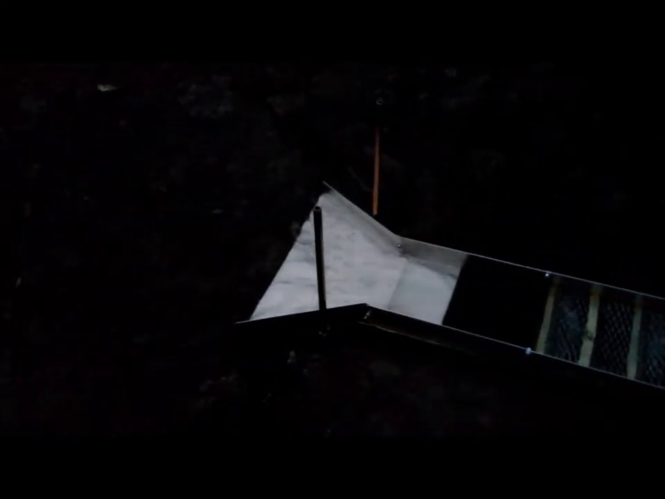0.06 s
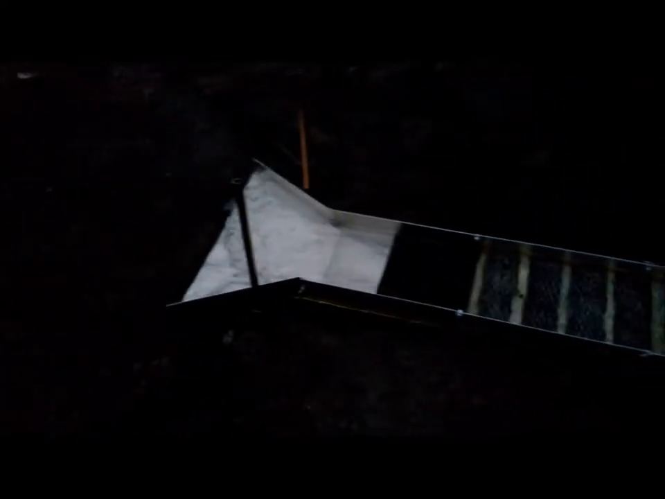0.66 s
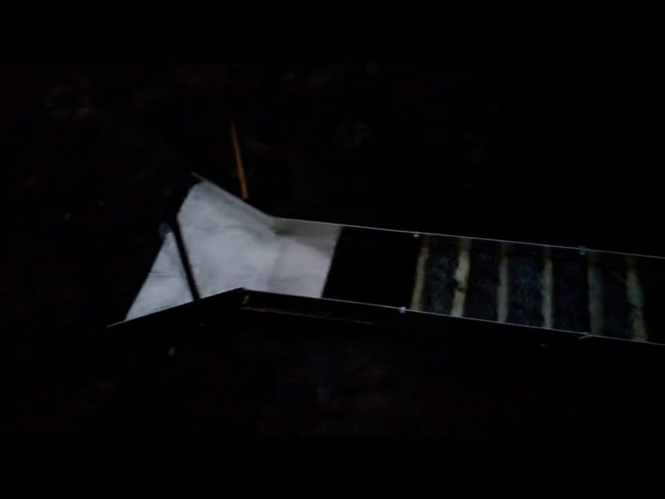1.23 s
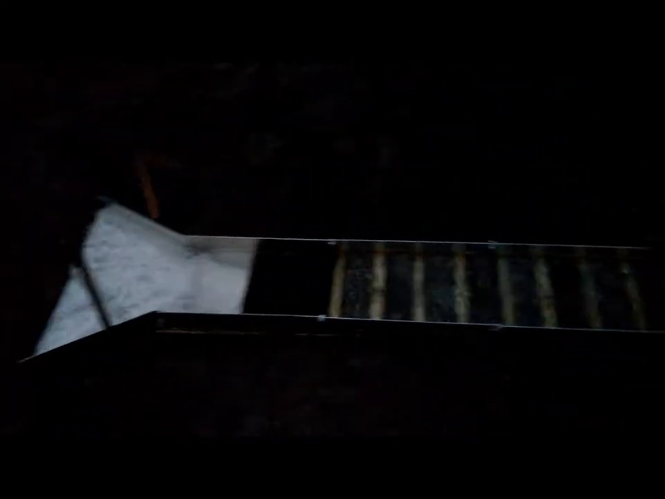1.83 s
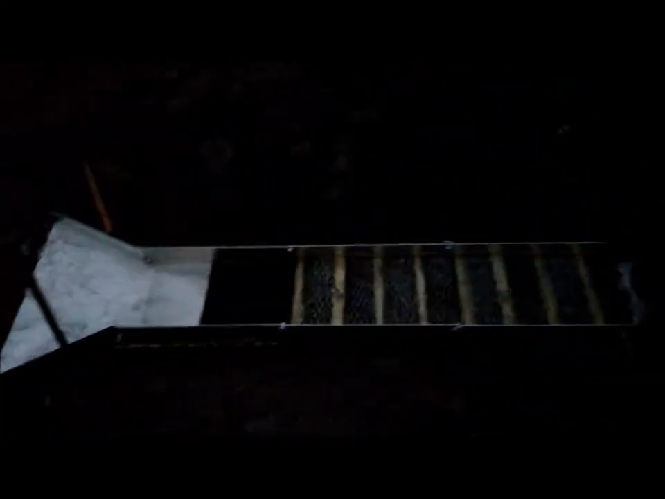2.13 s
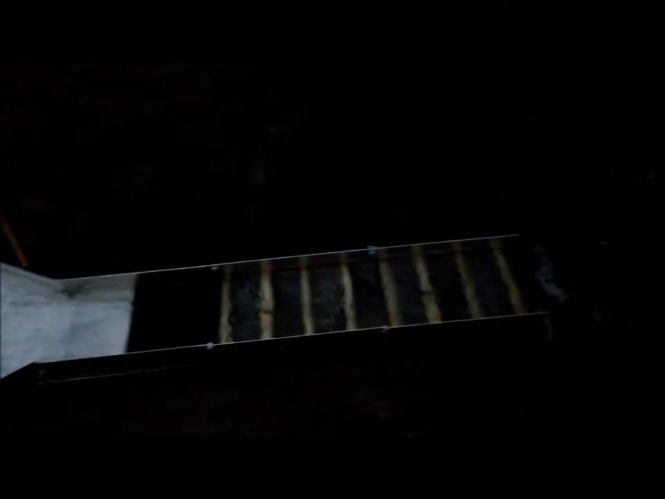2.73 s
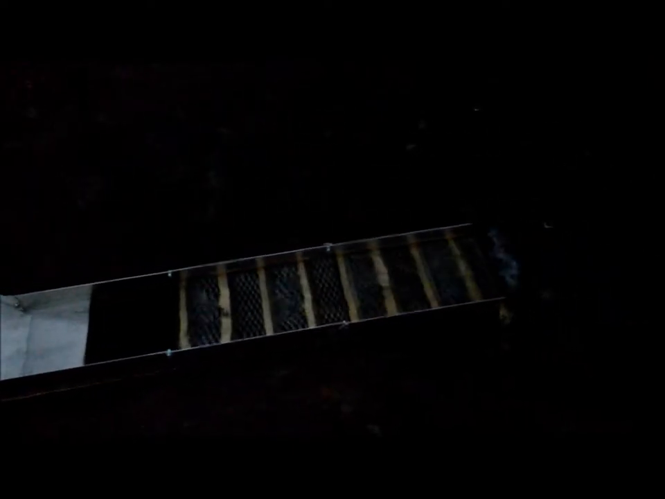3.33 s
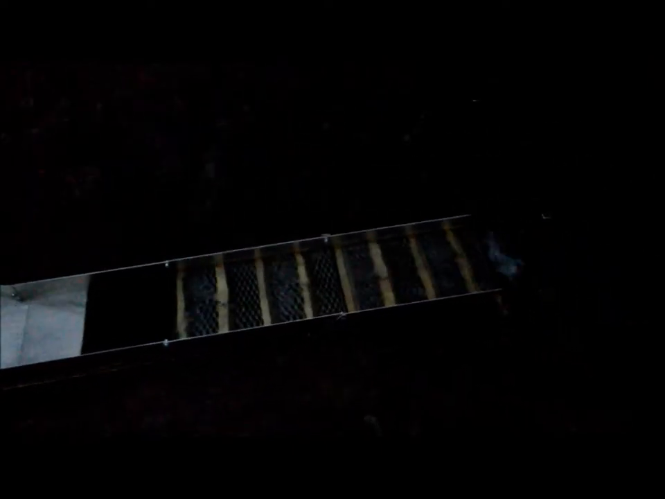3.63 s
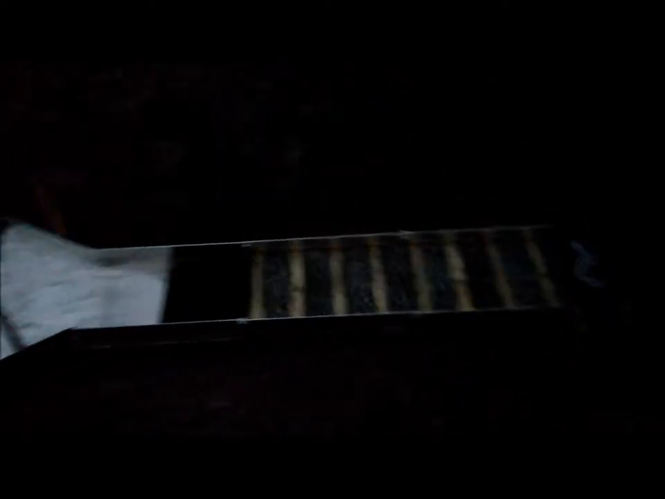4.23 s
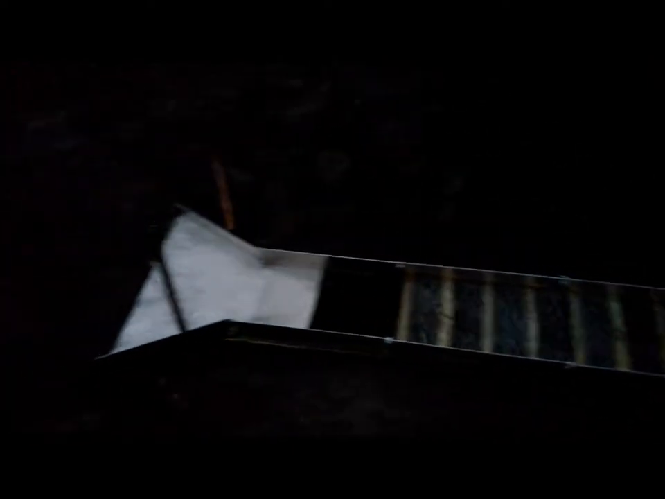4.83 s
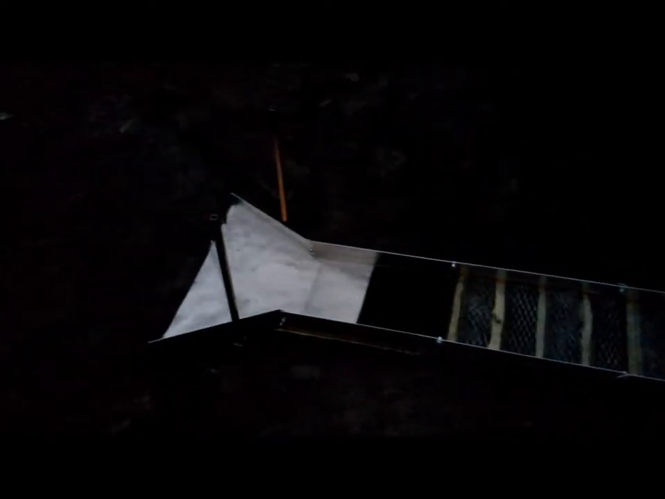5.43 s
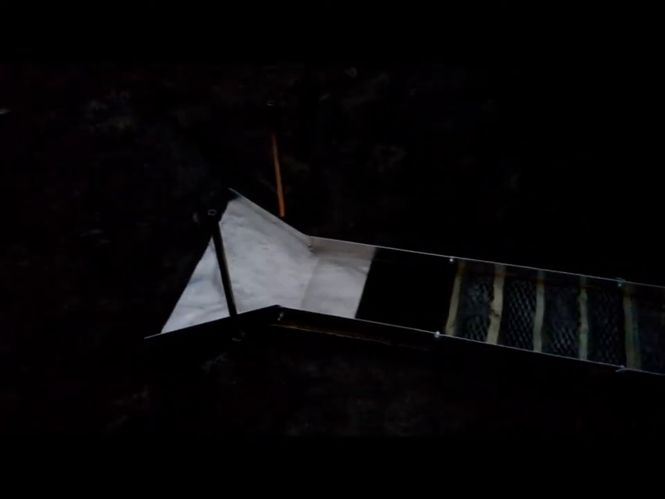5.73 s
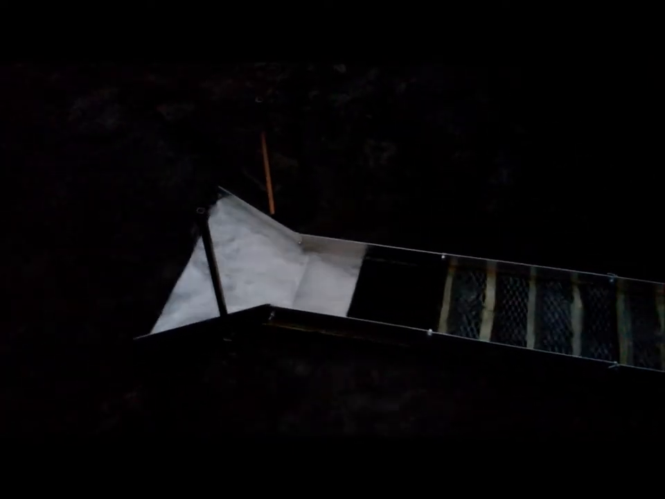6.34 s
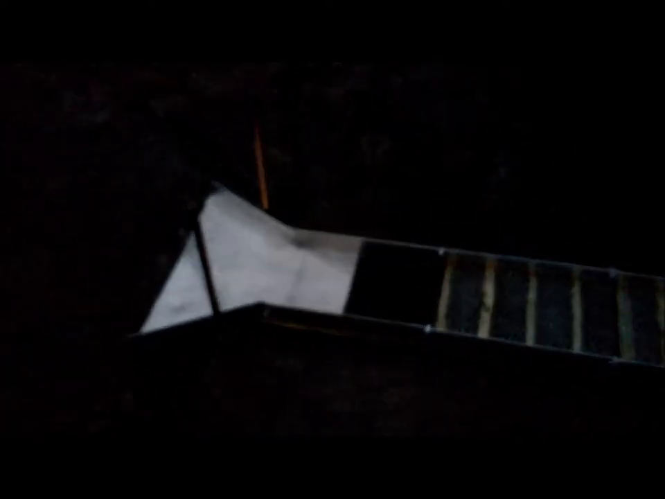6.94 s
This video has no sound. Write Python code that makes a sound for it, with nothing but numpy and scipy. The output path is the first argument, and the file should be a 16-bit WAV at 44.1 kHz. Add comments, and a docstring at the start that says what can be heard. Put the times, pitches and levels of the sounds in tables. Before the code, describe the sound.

Creek water runs through a metal sluice box outdoors and spills off the end in a continuous, bright, fizzing hiss. Small splashes and sharp droplet ticks dot the flow, while bubbles gurgle softly behind the riffles over a faint low rumble. Heard from close by, the spray grows louder and brighter in the middle as the microphone turns toward the outlet, then eases back.

```python
"""Fizzing spray, splashes and ticking droplets: creek water spills off the end of a metal sluice box.
Behind the riffles air pockets gurgle and break up, each bubble ringing with a small upward chirp.
Foam seethes and a thin jet gushes over the low rumble of the creek.
The listener, close by, turns toward the outlet for a while, where the spray is louder and brighter."""
import sys
import numpy as np
from scipy import signal
from scipy.fft import rfft, irfft, dct, next_fast_len
from scipy.io import wavfile

SR = 44100
rng = np.random.default_rng(int(sys.argv[2]) if len(sys.argv) > 2 else 0)


def persist_wave(psi):
    """Save psi, clipped to +-1, as 16-bit WAV."""
    counts = np.round(np.clip(psi, -1, 1) * 32767).astype(np.int16)
    wavfile.write(sys.argv[1], SR, np.atleast_2d(counts).T)


N = 307377
TIME = np.arange(N) / SR

# steady spray before its treble tilt, loudest facing the outlet: t/s, level/dB
SPRAY_FADER = [(0, -28), (1.0, -23), (1.9, -23.5), (2.6, -20.5), (3.9, -20.5), (4.5, -24.5), (4.85, -31),
               (5.2, -27), (6.0, -27.5), (6.55, -26.5), (6.7, -34.5), (6.97, -24)]
# big slaps of water over the lip: crest t/s, level/dB, swell/s
SPLASH_CUES = [(0.237, -20, 0.0046), (0.548, -27, 0.024), (0.843, -21, 0.018), (1.13, -20.5, 0.012),
               (1.628, -14.5, 0.0095), (1.702, -20, 0.013), (2.085, -22.5, 0.022), (2.156, -24.5, 0.017),
               (2.377, -20, 0.011), (2.658, -20, 0.0086), (2.938, -15, 0.011), (3.069, -17, 0.0067),
               (3.318, -18.5, 0.018), (3.499, -14.5, 0.01), (3.54, -16.5, 0.017), (3.696, -19.5, 0.02),
               (3.806, -15, 0.0074), (3.887, -18, 0.0071), (4.256, -16, 0.0034), (4.62, -19.5, 0.0048),
               (5.125, -25.5, 0.039), (5.391, -22.5, 0.0046), (5.734, -25.5, 0.026), (5.818, -19, 0.019),
               (6.594, -22, 0.011), (6.834, -22.5, 0.016)]
# the sharpest droplets: t/s, level/dB before EQ, f/Hz
DROPLET_CUES = [(0.3495, -3.5, 8500), (0.5105, 1, 12200), (0.6523, -4.5, 7900), (0.7605, -3.5, 8200),
                (1.0368, 0.5, 8300), (1.0555, -1.5, 8950), (1.1321, -1.5, 7700), (1.2058, -1, 8850),
                (1.4373, -6, 11400), (1.6277, -1, 11900), (1.6675, -1, 10900), (1.6985, -0.5, 8450),
                (2.0198, -3, 8400), (2.079, 0, 13200), (2.401, -1.5, 11600), (2.44, -3, 11800),
                (2.578, -1, 12200), (2.7812, -5, 6900), (2.813, 2, 12250), (2.9825, -1, 11200),
                (3.155, 2.5, 11200), (3.321, 3, 12700), (3.37, 0.5, 10800), (3.5035, -7, 12800),
                (3.5684, -6.5, 6860), (3.637, -1, 10260), (3.7125, 1, 11200), (3.7695, 0.5, 11530),
                (3.8038, 0.5, 11900), (3.8835, 2, 10200), (3.9025, 2.5, 12440), (3.962, 0.5, 12300),
                (4.0574, -1, 11900), (4.1143, 0.5, 11900), (4.259, -5, 8500), (5.031, -8, 12300),
                (5.1062, -7, 9000), (5.158, -6, 7680), (5.2113, -4, 12000), (5.5313, -5.5, 10000),
                (5.7065, -2, 11900), (5.8272, -1.5, 8900), (6.088, -7, 7600), (6.2037, -8, 8260),
                (6.2456, -9.5, 7700), (6.301, -6, 8800), (6.424, -8, 10100), (6.532, -7, 8500),
                (6.784, -7, 10070), (6.883, -5, 12500)]
# the clearest air pockets breaking up: crest t/s, level/dB over 20 ms, f/Hz
BUBBLE_CUES = [(0.073, -33.5, 491), (0.166, -39, 855), (0.265, -42, 2190), (0.459, -34, 860),
               (0.554, -24.5, 7800), (0.669, -32.5, 1020), (0.691, -33.5, 746), (0.702, -25.5, 7200),
               (0.788, -33.5, 933), (0.839, -36.5, 803), (0.865, -34.5, 2480), (0.902, -31, 4520),
               (0.979, -33, 3520), (1.001, -35, 857), (1.033, -36.5, 1700), (1.041, -33, 3870),
               (1.123, -35.5, 742), (1.133, -34, 7310), (1.138, -25, 6120), (1.202, -35.5, 824),
               (1.236, -29.5, 2440), (1.3, -33, 4700), (1.411, -30, 5770), (1.443, -25.5, 6920),
               (1.444, -30.5, 2550), (1.469, -37, 790), (1.525, -38, 570), (1.608, -37.5, 820),
               (1.69, -33, 3260), (1.695, -34, 796), (1.831, -32, 880), (1.882, -34, 754),
               (1.997, -37, 905), (2.026, -32.5, 3880), (2.03, -31.5, 527), (2.081, -33.5, 670),
               (2.153, -27, 5320), (2.231, -34.5, 728), (2.328, -29, 4300), (2.368, -31, 1003),
               (2.603, -32, 946), (2.816, -32, 1066), (3.031, -33.5, 2690), (3.102, -32.5, 768),
               (3.139, -30, 4350), (3.164, -37, 765), (3.195, -26, 5800), (3.254, -37, 1080),
               (3.303, -32, 3210), (3.424, -32.5, 970), (3.518, -37.5, 810), (3.675, -33, 3800),
               (3.737, -37, 775), (3.744, -37.5, 1480), (3.748, -30, 5200), (3.877, -34.5, 2720),
               (3.895, -38, 800), (3.966, -37, 1260), (4.115, -28.5, 5140), (4.132, -35, 796),
               (4.187, -30, 3900), (4.194, -33, 680), (4.228, -31, 1313), (4.256, -29, 3520),
               (4.355, -35, 1675), (4.409, -33.5, 1095), (4.45, -36, 805), (4.533, -35, 1187),
               (4.625, -31.5, 4650), (4.63, -38, 670), (4.673, -36, 905), (4.786, -36, 730),
               (4.996, -35.5, 3170), (5.005, -37.5, 820), (5.041, -33.5, 890), (5.053, -37.5, 573),
               (5.101, -36, 770), (5.255, -37, 2900), (5.284, -33.5, 745), (5.312, -35, 800),
               (5.315, -36, 2230), (5.39, -33.5, 788), (5.458, -34, 1095), (5.464, -36, 770),
               (5.473, -36, 2240), (5.513, -40, 1820), (5.538, -31.5, 910), (5.912, -35, 3420),
               (6.046, -32.5, 590), (6.132, -33, 750), (6.21, -34, 3490), (6.237, -34, 790),
               (6.279, -35, 1250), (6.283, -31.5, 4040), (6.374, -38, 2260), (6.513, -32, 950),
               (6.76, -41, 2720), (6.85, -35.5, 1880), (6.855, -33, 791), (6.913, -37, 830)]
# fainter pockets, large to small: rate/(1/s), level/dB over 20 ms, lowest f/Hz, highest f/Hz
FAINT_POCKETS = [(3, -46.5, 540, 1400), (4, -46, 1400, 2600), (3, -38.5, 2400, 5600)]
# bubble showers where a splash folds under: crest t/s, level/dB, swell/s, middle f/Hz
SHOWER_CUES = [(0.684, -39, .012, 930), (0.82, -37, 0.02, 4740), (2.155, -25.5, 0.0063, 4900),
               (2.379, -31.5, 0.013, 4397), (2.581, -34, 0.03, 4650), (2.94, -31, 0.0079, 4850),
               (3.075, -23, 0.0047, 4850), (3.11, -37, 0.031, 732), (3.125, -29.5, .02, 4824),
               (3.719, -33, .017, 5200), (3.725, -34.5, 0.016, 3170), (3.966, -33.5, .007, 4060),
               (4.65, -36, 0.03, 644.5), (5.06, -38, .025, 897), (5.41, -37.5, .035, 830),
               (5.82, -33, 0.017, 5440), (6.615, -37, .014, 5720), (6.853, -28, .002, 2910)]
# seething foam, mostly 3 to 6 kHz: t/s, level/dB
SEETHE_FADER = [(0, -35), (0.2, -50), (0.55, -41), (0.9, -38), (1.6, -44), (1.85, -39.5), (2.5, -39.5),
                (4.2, -40), (4.5, -41.5), (4.8, -36.5), (5.1, -39.5), (5.5, -42), (6.25, -43.5), (6.8, -48),
                (6.97, -35)]
# thin jet between the riffles: t/s, level/dB
JET_FADER = [(0, -46), (1.8, -49), (4.15, -55), (4.45, -46), (6.3, -45.5), (6.39, -40.5), (6.47, -39.5),
             (6.56, -47), (6.6, -36.5), (6.66, -45), (6.74, -37), (6.97, -41)]
# heaves of the rumble: crest t/s, rise/dB before EQ
HEAVE_CUES = [(2.6, 7), (3.4, 5.5), (4.03, 7), (6.02, 6), (6.4, 6.5)]
# tone of each layer: f/Hz, level/dB
SPRAY_EQ = [(300, -21.5), (1500, -15.5), (3000, -15), (4500, -7), (5400, -8), (6300, -6), (7200, -0.5),
            (8300, 1), (10000, 1.4), (11800, 2), (13000, 1), (14200, -1.5), (16000, -4.5)]
GURGLE_EQ = [(200, -48), (380, -11.5), (480, -5), (620, -3.5), (770, 2), (1020, 0.5), (1350, -10.5),
             (1900, -4.5), (4000, -44)]
SEETHE_EQ = [(1800, -23), (2700, -8), (3300, -3.5), (4300, -4.5), (6000, -6), (9000, -21.5)]
WASH_EQ = [(100, -15), (400, -17), (700, 8), (1300, 3), (1900, -2.5), (2700, -12), (4000, -7), (6000, -36),
           (16000, -8)]
RUMBLE_EQ = [(10, -20), (28, -11.5), (50, -6.5), (75, -2.5), (105, -0.5), (145, -7.5), (195, -12),
             (250, -18), (380, -23.5), (700, -40), (2000, -70)]
HEAVE_EQ = [(105, 2.5), (165, -20)]


def spill():
    """Envelope of the water over the lip: a fluttering flow, big splashes and small random slaps."""
    power = gain_of(spray_db(TIME) + 0.98 * wander(per_s=66)) ** 2
    slaps = [(s, spray_db(s) + 4 + db, swell_s)
             for s, db, swell_s in chance(per_s=6, spread_db=3.5, low=0.0014, high=0.0056)]
    for s, db, swell_s in SPLASH_CUES + slaps:
        u = np.arange(0, 7, 1 / (swell_s * SR))
        add(power, s - swell_s, (gain_of(db) * swell(u)) ** 2)
    return np.sqrt(power)


def spray(flow):
    """Fizz and countless tiny bursting bubbles; the top octave beams out of the outlet."""
    fizz = patchy_noise(SPRAY_EQ, depth_db=3, patch_hz=1830, patch_s=0.0065, size=256)
    grains = swarm(5050, 16200, per_s=3000, cycles=1.4, spread_db=5, rise=0.093, sizes=60)
    grains = unit_rms(spatter(eq(grains, SPRAY_EQ), spatter_db=-12, fade_s=0.0083))
    mist = flow * (gain_of(-4) * fizz + gain_of(-2) * grains)
    top = eq(mist, [(7000, -41), (9000, -22), (11500, -10.5)])
    averted_db = -29.5  # spray level at which the tilt is flat
    tilt_db = 1.12 * (spray_db(TIME) - averted_db)
    return (mist - top) * gain_of(-tilt_db / 2) + top * gain_of(tilt_db / 2)


def droplets():
    """Each near droplet lands with a tick a few cycles long; lesser drips fall at random."""
    out = np.zeros(N)
    drips = [(s, spray_db(s) + 16.5 + db, hz)
             for s, db, hz in chance(per_s=2.6, spread_db=0.5, low=8200, high=13100)]
    for s, db, hz in DROPLET_CUES + drips:
        swell_s = 2.1 / hz
        add(out, s - swell_s, gain_of(db) * ring(hz, swell_s, rise=0.01))
    ticks = eq(out, [(2000, -13), (5000, 4), (7000, -3)])
    return spatter(ticks, spatter_db=-4, fade_s=0.0029)


def air_pockets():
    """A pocket breaks up with a snap: one clear bubble rings inside a cloud, and two trail after."""
    out = np.zeros(N)
    faint = [(s, level_db + db, hz) for per_s, level_db, low, high in FAINT_POCKETS
             for s, db, hz in chance(per_s, spread_db=2, low=low, high=high)]
    for s, db, hz in BUBBLE_CUES + faint:
        strength = gain_of(db) * np.sqrt(0.02 * SR)
        clear = blip(hz)
        start = s - np.argmax(abs(clear)) / SR
        cloud_s = 0.0055 * (hz / 1000) ** -0.25
        cloud_share = value_at([(500, 0.2), (800, 0.23), (1500, 0.097), (4500, 0.44)], hz)
        add(out, start, strength * np.sqrt(1 - cloud_share) * clear)
        add(out, s - cloud_s, strength * np.sqrt(cloud_share) * cloud(hz, cloud_s))
        for delay, pitch in wake(hz):
            add(out, start + delay, strength * gain_of(-11) * rng.random() * blip(pitch))
        snap = unit_energy(ring(1.31 * hz, 1.4 / hz, rise=0))
        snap_db = value_at([(1000, -15), (2000, -13.5), (4000, -11)], hz)
        add(out, start, strength * gain_of(snap_db) * snap)
    return sluice_reverb(out, wet_db=-11, t60=0.08)


def blip(hz):
    """One clear bubble: small ones die sooner, and each chirps upward by its own amount."""
    swell_s = 0.0056 * (hz / 1000) ** -0.5 * rng.uniform(0.75, 1.3)
    return unit_energy(ring(hz, swell_s, rise=rng.uniform(0.03, 0.13)))


def cloud(hz, swell_s):
    """A blur of bubbles close to one size, born in spurts."""
    u = np.arange(0, 7, 1 / (swell_s * SR))
    spurts = abs(band_noise(len(u), width_hz=670)) ** 0.75
    blur = (band_noise(len(u), width_hz=0.17 * hz) * np.exp(2j * np.pi * hz * swell_s * u)).real
    return unit_energy(swell(u) * spurts * blur)


def wake(hz, count=2, wait_s=0.013, octaves=0.29):
    """Bubbles shed behind a pocket: delay/s, f/Hz."""
    wait, detune = rng.random((count, 2)).T
    return zip(np.cumsum(wait_s * (wait + 0.5)), hz * 2 ** (octaves * (2 * detune - 1)))


def showers(births_per_cycle=0.14, octaves=0.16, swell_cycles=4):
    """A splash drags air under: a crowd of small bubbles rings briefly around one pitch."""
    out = np.zeros(N)
    for s, db, swell_s, middle_hz in SHOWER_CUES:
        crowd = np.zeros(SR // 2)
        count = int(4 * swell_s * births_per_cycle * middle_hz) + 2
        for early, late, strength, detune in rng.random((count, 4)):
            hz = middle_hz * 2 ** (octaves * np.sqrt(12) * (detune - 0.5))
            delay = -swell_s * np.log(early * late) / np.sqrt(2)  # births bunch up, then thin out
            add(crowd, delay, strength ** 2 * ring(hz, swell_cycles / hz, rise=0.091))
        add(out, s - swell_s, gain_of(db) * np.sqrt(2 * swell_s * SR) * unit_energy(crowd))
    return sluice_reverb(out, wet_db=-9, t60=0.049)


def gurgle():
    """Large bubbles churn behind the riffles: gliding blips over a soft blur of distant ones."""
    distant = patchy_noise(GURGLE_EQ, depth_db=3.5, patch_hz=213, patch_s=0.046, size=1024)
    near = swarm(490, 1400, per_s=100, cycles=4.6, spread_db=1.9, rise=0.065, sizes=48)
    near = unit_rms(eq(sluice_reverb(near, wet_db=-11.5, t60=0.044), GURGLE_EQ))
    return gain_of(-47) * distant + gain_of(-42.5) * near


def trickle():
    """Middle-sized bubbles tinkle and tick over the creek's wash; foam seethes, coming and going."""
    tinkle = swarm(1150, 3000, per_s=130, cycles=6.5, spread_db=3, rise=0.06, sizes=36)
    ticks = swarm(1500, 5000, per_s=45, cycles=1.2, spread_db=2.5, rise=0, sizes=20)
    foam = swarm(2700, 6500, per_s=650, cycles=4.6, spread_db=3.3, rise=0.05, sizes=36)
    hiss = patchy_noise(SEETHE_EQ, depth_db=6, patch_hz=900, patch_s=0.027, size=512)
    wash = patchy_noise(WASH_EQ, depth_db=4.5, patch_hz=500, patch_s=0.04, size=512)
    seethe = gain_of(fader(SEETHE_FADER)) * (gain_of(-3.5) * foam + gain_of(-5.5) * hiss)
    in_box = gain_of(-45.5) * tinkle + gain_of(-50.5) * ticks + seethe
    return sluice_reverb(in_box, wet_db=-8, t60=0.049) + gain_of(-42.5) * wash


def jet(base_hz=2544, base_db=-45, sag_hz_per_db=16):
    """A narrow, hollow gush: a stronger jet digs a larger air cavity and sounds lower."""
    db = fader(JET_FADER)
    pitch = (base_hz - sag_hz_per_db * (db - base_db)) * (1 + 0.03 * wander(per_s=30.3))
    gush = (band_noise(N, width_hz=520) * np.exp(2j * np.pi * np.cumsum(pitch) / SR)).real
    flutter = gain_of(3.7 * wander(per_s=86))
    return gain_of(db) * unit_rms(gush * flutter)


def rumble(heave_s=0.073):
    """The deep churn of the creek, its low end heaving now and then, and a faint wavering hum."""
    deep = patchy_noise(RUMBLE_EQ, depth_db=3, patch_hz=60.4, patch_s=0.078, size=4096)
    heave_db = sum(db * np.exp(-((TIME - s) / heave_s) ** 2) for s, db in HEAVE_CUES)
    heave = (gain_of(heave_db) - 1) * eq(deep, HEAVE_EQ)
    hum_hz = 161.4 + 2 * wander(per_s=4.7)
    hum = np.sin(2 * np.pi * np.cumsum(hum_hz) / SR) * gain_of(3.2 * wander(per_s=2))
    return gain_of(-46.5) * (deep + heave) + gain_of(-57.5) * unit_rms(hum)


def ring(hz, swell_s, rise):
    """One bubble swells, rings out, and climbs in pitch as it nears the surface."""
    u = np.arange(int(9 * swell_s * SR) + 2) / (swell_s * SR)
    pitch = hz * (1 + rise * np.tanh((u - 1) / 2))
    return swell(u) * np.sin(2 * np.pi * (np.cumsum(pitch) / SR + rng.random()))


def swarm(low_hz, high_hz, per_s, cycles, spread_db, rise, sizes):
    """Bubbles of many sizes at random moments; most are faint, a few stand out."""
    out = np.zeros(N)
    pitches = np.geomspace(low_hz, high_hz, sizes)
    for hz, (length, glide) in zip(pitches, rng.uniform(0.5, 1.5, (sizes, 2))):
        when, rarity, lot = rng.random((3, 2000))
        born = lot < per_s * TIME[-1] / sizes / len(lot)
        accent_db = spread_db * np.minimum(-np.log(rarity[born]), 3.8)
        triggers = np.bincount((when[born] * N).astype(int), gain_of(accent_db), N)
        bubble = ring(hz, length * cycles / hz, glide * rise)
        out += unit_rms(signal.oaconvolve(triggers, bubble)[:N])
    return unit_rms(out)


def spatter(x, spatter_db, fade_s):
    """Each tick throws off finer drops: a brief fizz that dies away behind it."""
    decay = np.exp(-1 / (fade_s * SR))
    power = signal.lfilter([1 - decay], [1, -decay], x ** 2)
    fizz = unit_rms(eq(rng.standard_normal(N), SPRAY_EQ))
    return x + gain_of(spatter_db) * np.sqrt(power) * fizz


def sluice_reverb(x, wet_db, t60):
    """The metal walls and the water surface scatter each sound back within milliseconds."""
    t = np.arange(4096) / SR
    taps = rng.standard_normal(len(t)) * (rng.random(len(t)) < 0.1)
    tail = taps * (t > 0.0006) * gain_of(-60 * t / t60)
    return x + gain_of(wet_db) * signal.oaconvolve(x, unit_energy(tail))[:N]


def patchy_noise(tone, depth_db, patch_hz, patch_s, size):
    """A noise bed whose level drifts in patches over time and frequency."""
    frames = dict(fs=SR, nperseg=size, noverlap=size * 3 // 4)
    hz, t, spectrum = signal.stft(rng.standard_normal(N), **frames)
    ripples = dct(dct(rng.standard_normal(spectrum.shape), axis=0, norm="ortho"), axis=1, norm="ortho")
    across = np.arange(len(hz))[:, None] * patch_hz / hz[-1]
    along = np.arange(len(t)) * patch_s / t[-1]
    ripples *= np.exp(-across ** 2 - along ** 2)  # only broad ripples survive
    patches = unit_rms(dct(dct(ripples, type=3, axis=0, norm="ortho"), type=3, axis=1, norm="ortho"))
    noise = signal.istft(spectrum * gain_of(depth_db * patches), **frames)[1][:N]
    return unit_rms(eq(noise, tone))


def band_noise(size, width_hz):
    """Complex noise around 0 Hz: the beating of many close pitches."""
    z = rng.standard_normal(size + 2048) + 1j * rng.standard_normal(size + 2048)
    z = signal.sosfilt(signal.butter(2, width_hz / 2, fs=SR, output="sos"), z)[2048:]
    return z / np.sqrt(np.mean(abs(z) ** 2))


def wander(per_s):
    """Smooth random modulation of rms 1 that changes about per_s times a second."""
    hz = np.fft.rfftfreq(2 ** 19, 1 / SR)
    return unit_rms(irfft(rfft(rng.standard_normal(2 ** 19)) / (1 + (hz / per_s) ** 4))[:N])


def chance(per_s, spread_db, low, high):
    """Scattered cues: t/s, level offset/dB, a value between low and high."""
    when, level, value = rng.random((int(per_s * TIME[-1]), 3)).T
    s = (np.arange(len(when)) + when) / per_s
    return np.transpose([s, spread_db * np.sqrt(12) * (level - 0.5), low * (high / low) ** value])


def swell(u):
    """Envelope that crests at u = 1 and dies away."""
    return u * np.exp(1 - u)


def fader(rows, s=TIME):
    """Straight ramps through rows of t/s, level/dB."""
    return np.interp(s, *np.transpose(rows))


def spray_db(s):
    """The spray's fader at time s."""
    return fader(SPRAY_FADER, s)


def eq(x, points):
    """Filters by a curve of f/Hz, level/dB."""
    size = next_fast_len(N + 4096)
    response = gain_of(value_at(points, np.fft.rfftfreq(size, 1 / SR)))
    return irfft(rfft(x, size) * response, size)[:N]


def value_at(points, hz):
    """Reads a curve on a log-frequency axis."""
    f, value = np.transpose(points)
    return np.interp(np.log(hz + 1), np.log(f + 1), value)


def add(mix, s, sound):
    """Mixes a sound in at time s."""
    part = mix[max(round(s * SR), 0):][:len(sound)]
    part += sound[:len(part)]


def gain_of(db):
    """Decibels to a factor."""
    return 10 ** (np.asarray(db) / 20)


def unit_rms(x):
    """Scales to rms 1."""
    return x / np.sqrt(np.mean(x ** 2) + 1e-20)


def unit_energy(x):
    """Scales to energy 1."""
    return x / np.linalg.norm(x)


def scene():
    """All the water, in mono."""
    outlet = spray(spill()) + droplets()
    return (outlet + air_pockets() + showers() + gurgle() + trickle() + jet() + rumble())[None]


def record(dry):
    """The sharpest ticks clip at full scale; a steep high cut follows."""
    high_cut = signal.firwin(511, 15850, window=("kaiser", 8), fs=SR)
    return signal.oaconvolve(np.clip(dry, -1, 1), high_cut[None], "same")


dry = scene()
out = record(dry)
persist_wave(out)
```